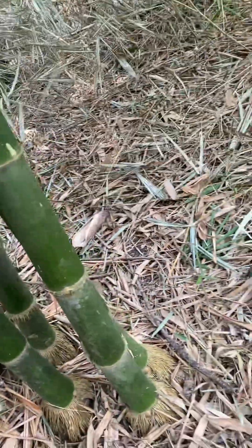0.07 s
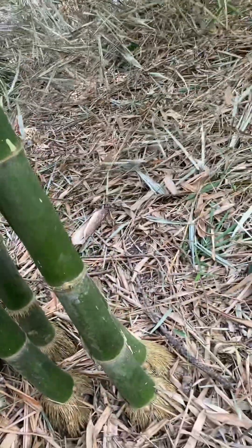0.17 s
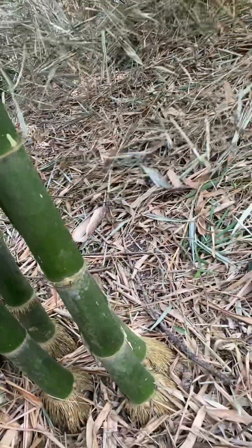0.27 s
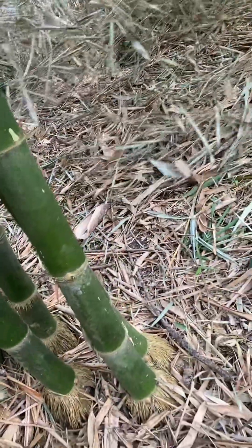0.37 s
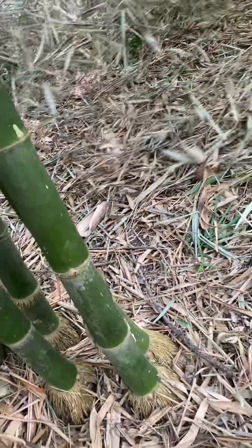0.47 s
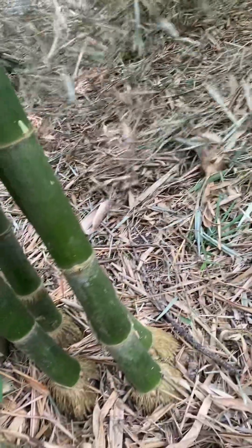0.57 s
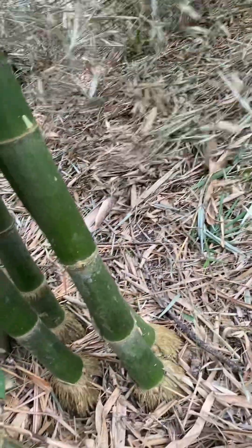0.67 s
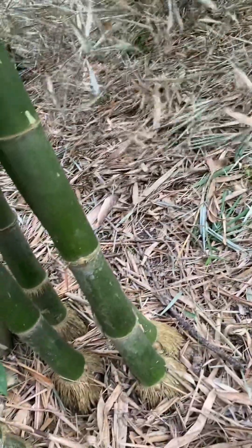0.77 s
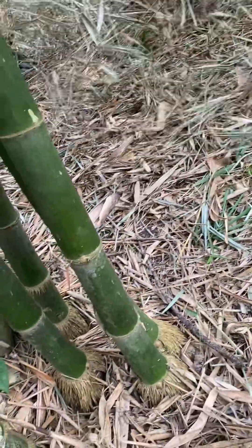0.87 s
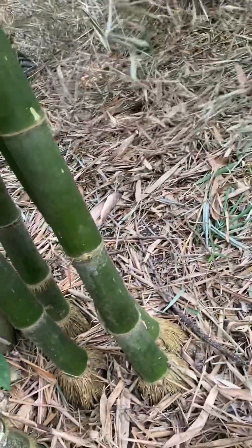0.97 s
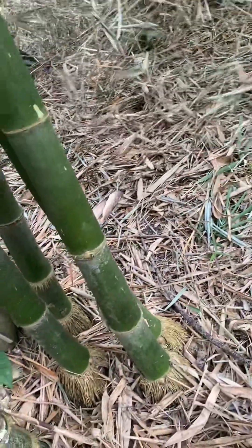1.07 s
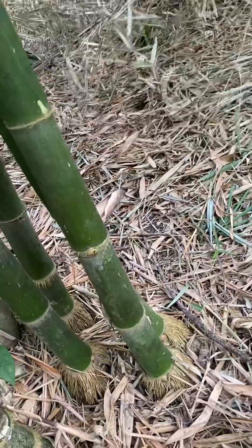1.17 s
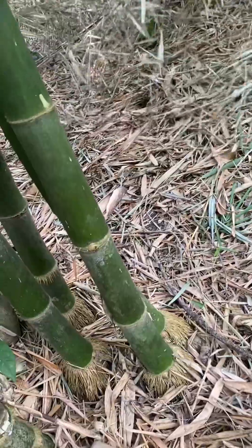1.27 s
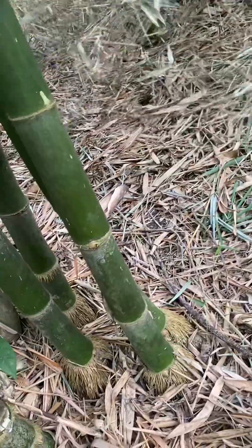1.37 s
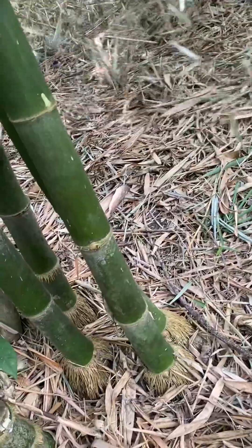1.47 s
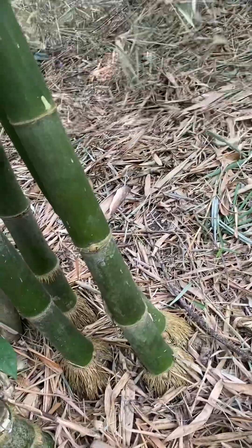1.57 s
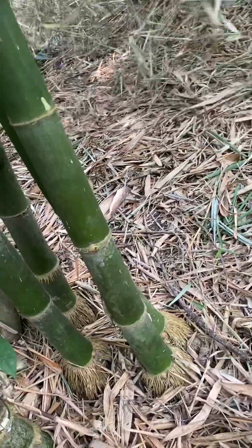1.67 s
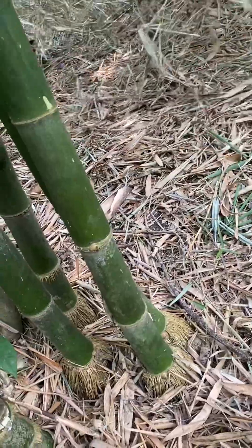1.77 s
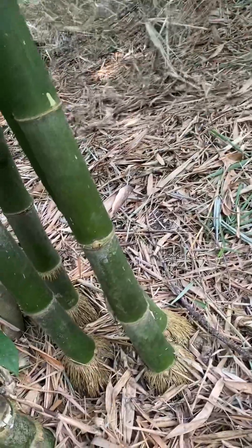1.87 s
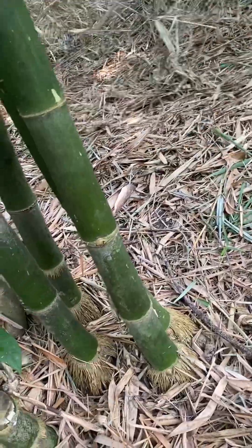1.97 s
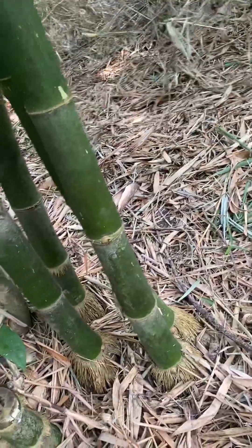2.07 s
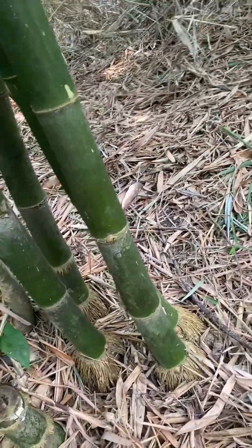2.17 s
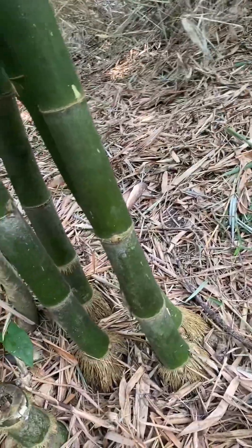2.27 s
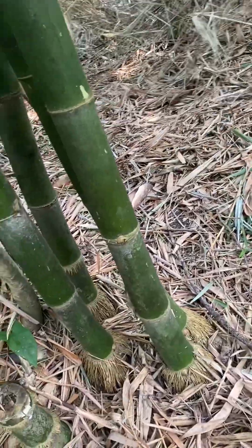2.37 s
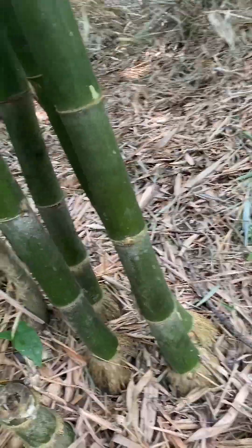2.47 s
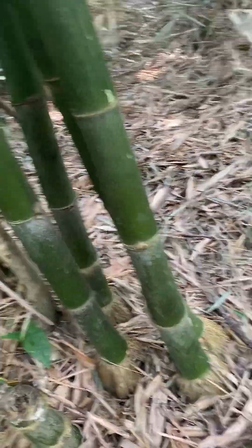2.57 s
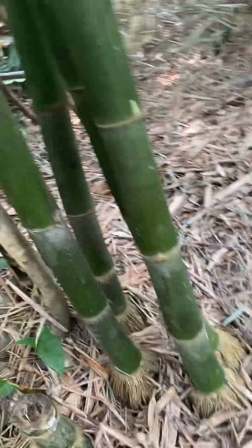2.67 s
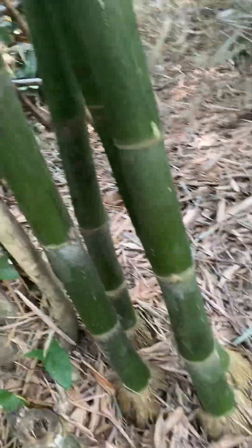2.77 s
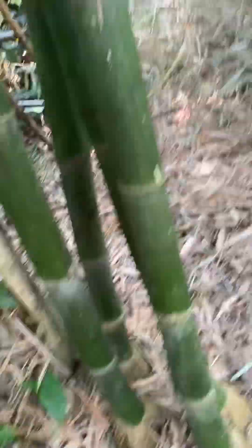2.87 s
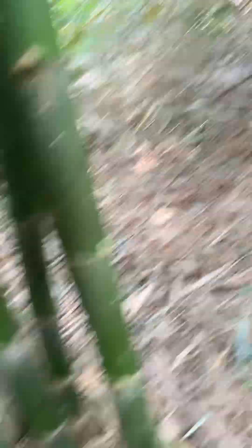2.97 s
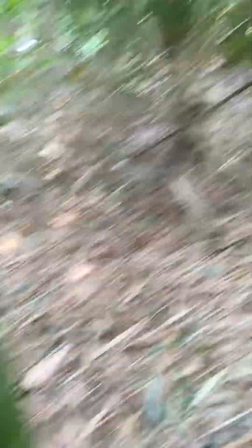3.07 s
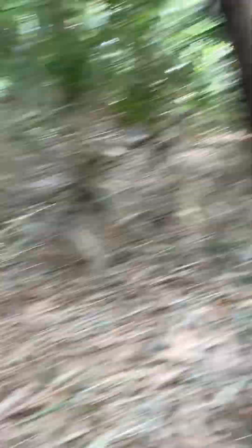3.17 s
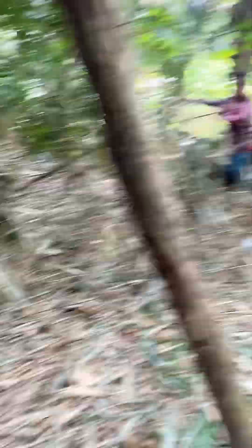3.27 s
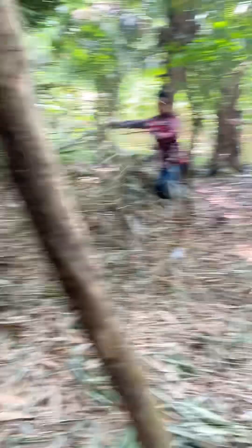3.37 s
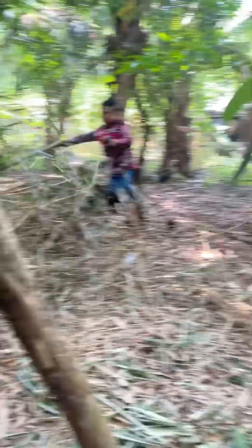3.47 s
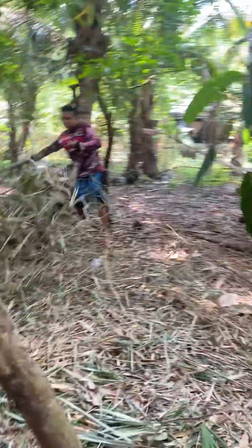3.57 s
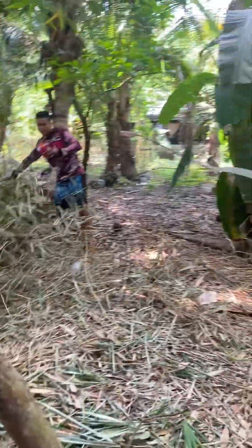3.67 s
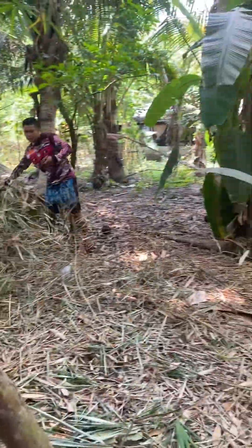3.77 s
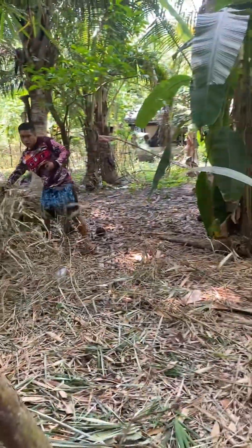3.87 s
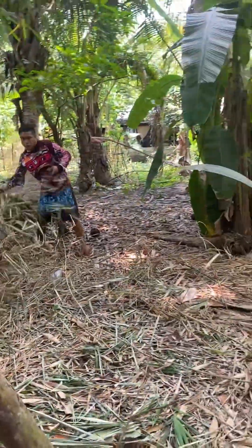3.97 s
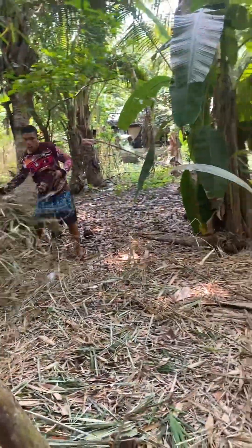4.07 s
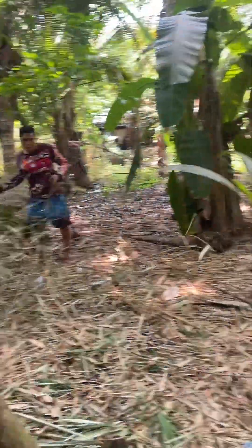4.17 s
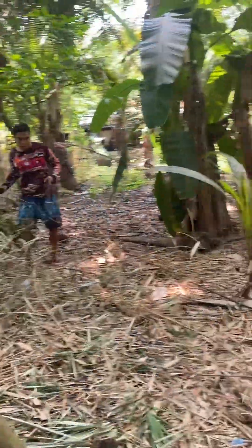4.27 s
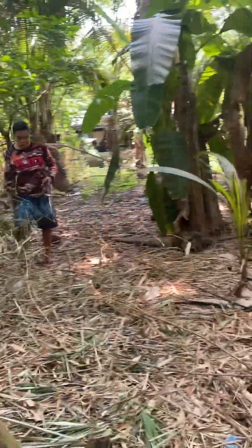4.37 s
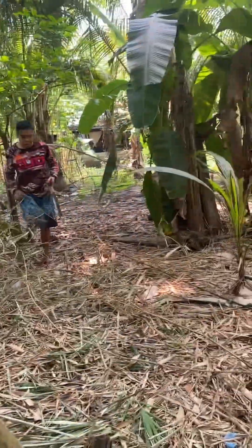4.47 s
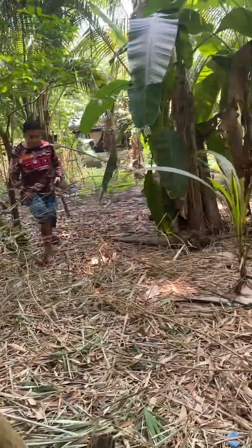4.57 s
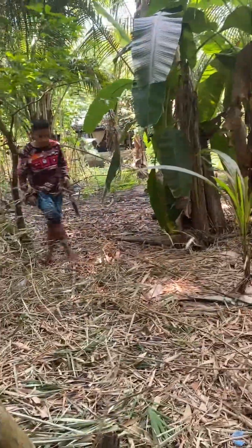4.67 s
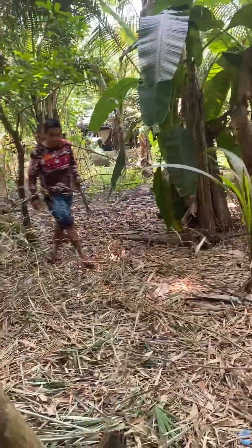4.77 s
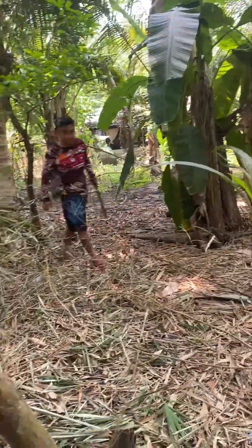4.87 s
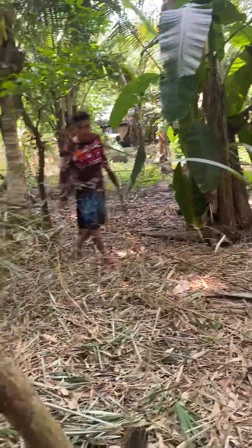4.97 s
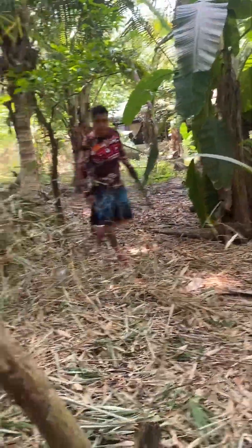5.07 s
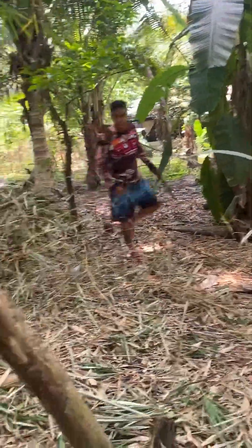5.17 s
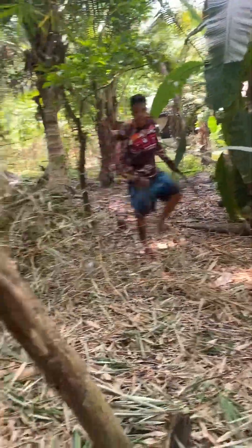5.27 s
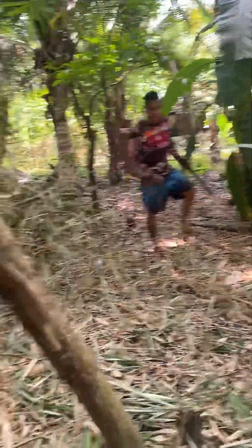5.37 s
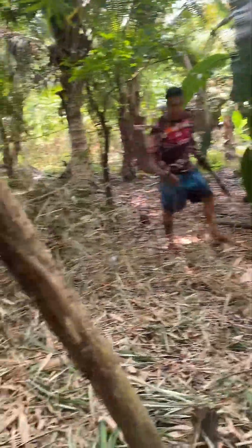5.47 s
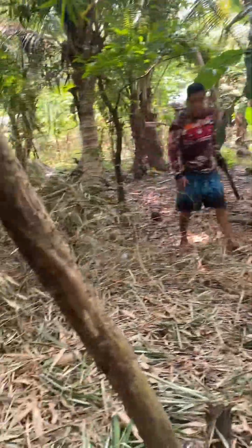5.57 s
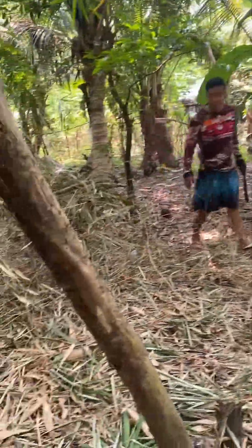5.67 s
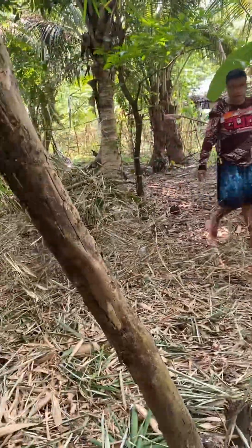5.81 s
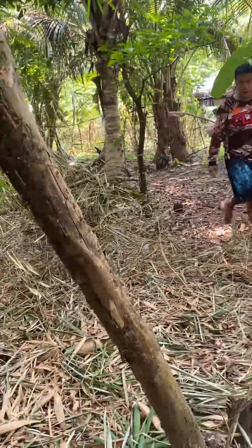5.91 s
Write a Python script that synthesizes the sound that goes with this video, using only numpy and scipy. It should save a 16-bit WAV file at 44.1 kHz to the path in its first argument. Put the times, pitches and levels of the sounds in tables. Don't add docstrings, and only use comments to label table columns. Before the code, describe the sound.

Outdoors in a grove, a bundle of dry leafy branches is dragged across leaf litter, a bright close hiss full of leaf ticks, twig cracks and small hollow knocks. It surges unevenly, fades after about four seconds, and gives way to crunching footsteps. A faint low motor drones far off, with brief soft hoots at the start. Close stereo microphone.

```python
import sys
import numpy as np
from scipy import signal
from scipy.fft import rfft, irfft, dct
from scipy.io import wavfile
from scipy.ndimage import uniform_filter1d

SR = 44100
rng = np.random.default_rng(int(sys.argv[2]) if len(sys.argv) > 2 else 0)


def nominal_scale(level):
    x = np.asarray(level, float) / 20
    return 10 ** x


def put_to_file(sound):
    columns = np.atleast_2d(sound).T
    safe = np.clip(columns, -1, 1)
    whole_steps = np.round(safe * 32767)
    wavfile.write(sys.argv[1], SR, whole_steps.astype(np.int16))


N = 261954


def rms_one(x):
    return x / np.sqrt(np.mean(x ** 2) + 1e-20)


def spectrum_hz():
    return np.maximum(np.arange(N // 2 + 1) * SR / N, 1)


def at_hz(points, hz, column=1):
    points = np.array(points)
    return np.interp(np.log(hz), np.log(points[:, 0]), points[:, column])


def coloured(x, points):
    return irfft(rfft(x) * nominal_scale(at_hz(points, spectrum_hz())), N)


def band(x, low_hz, high_hz):
    sos = signal.butter(2, [low_hz, min(high_hz, SR / 2.2)], "band", fs=SR, output="sos")
    return signal.sosfilt(sos, x)


def drift(rate):
    every, settle = 20, 4000
    r = np.exp(-2 * np.pi * rate * every / SR)
    white = rng.standard_normal(N // every + settle + 2)
    slow = signal.lfilter([1], [1, -2 * r, r * r], white)[settle:]
    return np.interp(np.arange(N) / every, np.arange(len(slow)), rms_one(slow))


def surge(s, rise_s, fall_s):
    return np.interp(np.arange(N) / SR, [s - rise_s, s, s + fall_s], [0, 1, 0])


def effort():
    # time in seconds, speed in dB against full drag, wood in dB (more twig than leaf).
    pull = [(0.0, -9.5, 4), (0.18, -10.5, 0.1), (0.37, -0.3, -1.2), (1.22, -2, -1.4), (1.44, 1.2, -2.8),
            (1.95, -1, -2.2), (2.33, -3.6, -3.6), (2.62, 0.2, -2), (2.87, -2.4, 0.2), (3.16, 1.7, 1.1),
            (3.41, -2.2, 1.6), (3.63, 1.7, 3), (3.77, 1.5, 1.1), (3.93, -5, 1.9), (4.22, -2.5, 2.5),
            (4.57, -13, 4), (5.04, -17.5, 3), (5.845, -23, 7)]
    # time in seconds, surge in dB, wood in dB.
    tugs = [(.61, 3, .6), (.82, 2.6, -1.5), (.89, 3.2, -1), (1.315, -.3, 3), (1.57, 1.6, 1.5),
            (1.77, 2.4, -1.5), (2.06, 2.2, 1.2), (2.405, 2.6, 2.2), (2.51, 1.2, 2.2), (2.645, 2.4, -.4),
            (2.785, 1.2, 1.1), (2.98, .8, 1.6), (4.006, 1.8, .2), (4.425, 1.5, -.5)]
    # time in seconds, surge in dB, press and release in seconds, wood in dB.
    steps = [
        (4.69, 3, .12, .11, -1),
        (4.94, 10, .14, .055, 2.2),
        (5.28, 8.5, .21, .22, -5.5),
        (5.528, 14, .065, .3, -.5),
        (5.76, 4.5, .13, .07, .6),
        (5.91, 9, .06, .15, -3),
    ]
    s, *columns = np.transpose(pull)
    out = np.array([np.interp(np.arange(N) / SR, s, column) for column in columns])
    for s, db, wood_db in tugs:
        out = out + np.outer([db, wood_db], surge(s, rise_s=.07, fall_s=.09))
    for s, db, press_s, release_s, wood_db in steps:
        out = out + np.outer([db, wood_db], surge(s, press_s, release_s))
    return out


def turned():
    return np.interp(np.arange(N) / SR, (2.6, 3.6), [0, 1])


def contacts(per_s, spread_db, share):
    sizes_db = spread_db * np.minimum(rng.exponential(1, N), 4)
    sizes = nominal_scale(sizes_db) * (rng.random(N) < per_s / SR)
    near = rms_one(sizes * rng.standard_normal((2, N)))
    return rms_one(share * near + rng.standard_normal((2, N)))


def rustle(clump_db, patchy_db):
    # frequency in Hz, level in dB per Hz.
    full_drag = [(130, -16), (200, -11.5), (350, -7.5), (900, -7.5), (1750, -5.5), (2080, -8.5), (2600, -3),
                 (3000, -5), (4300, -1), (5000, -2), (6500, 0), (9500, 1.5), (12800, -.5), (15300, -8)]
    level_db = -70.6
    centres_hz = (9000, 4300, 1400, 400)
    follows_speed, follows_wood = (1, 1.04, 1.03, 1.17), (0, .2, 1, .7)
    turned_db, trim_db = (0, -1.5, .1, -3.0), (.3, .5, -.2, 2.2)

    shares = np.transpose([follows_speed, follows_wood, turned_db, trim_db])
    effort_db = (shares @ [*effort(), turned(), np.ones(N)])[::-1]
    centres = np.log(centres_hz[::-1])
    fields = [coloured(contacts(per_s=1500.0, spread_db=3.5, share=.3), full_drag) for _ in range(2)]
    clumps = drift(12.0) + .8 * drift(60.0)
    out, edges = 0, np.geomspace(110, 17500, 19)
    for k, (low, high) in enumerate(zip(edges, edges[1:])):
        weights = [np.interp(np.log(low * high) / 2, centres, row) for row in np.eye(4)]
        flicker_db = clump_db * clumps + patchy_db * drift(14.0)
        out = out + nominal_scale(weights @ effort_db + flicker_db) * band(fields[k % 2], low, high)
    return nominal_scale(level_db) * np.sqrt(SR / 2) * out


def hoots():
    # start in seconds, length in seconds, frequency in Hz, level in dB.
    notes = [
        (0.0, .04, 605, -55),
        (.045, .06, 600, -56),
        (.24, .07, 540, -58),
    ]
    t, out = np.arange(N) / SR, 0
    for s, length, hz, db in notes:
        swell = np.sin(np.pi * np.clip((t - s) / length, 0, 1)) ** .6
        out = out + nominal_scale(db) * np.sin(2 * np.pi * hz * t) * swell
    return np.sqrt(2) * out


def drone_db():
    # peak time in seconds, swell in dB.
    swells = [
        (.32, 2),
        (.64, 3),
        (1.1, 5),
        (1.6, 1.5),
        (2.48, 3),
        (2.79, 3),
        (3.16, 2.5),
        (4.0, -3),
        (5.18, 4),
        (5.62, 2),
    ]
    start_db, fade_db_per_s, throb_db = -46.6, 1.1, 1.1
    swell_db = sum(db * surge(s, rise_s=.15, fall_s=.15) for s, db in swells)
    return start_db - fade_db_per_s * np.arange(N) / SR + throb_db * drift(3.0) + swell_db


def drone():
    # frequency in Hz, level in dB per Hz.
    rumble = [(15, -43), (25, -13), (44, -2), (65, 0), (112, -3), (172, -15), (220, -13), (290, -43),
              (480, -120)]
    # centre in Hz, width in Hz, level in dB.
    firing = [
        (60, 4, -5),
        (95, 30, -5),
        (122, 7, -10),
    ]
    hz = spectrum_hz()
    colour = nominal_scale(at_hz(rumble, hz)) * np.clip(hz / 45, 0, 1) ** 2.1 * (hz < 260)
    out = rms_one(irfft(rfft(rng.standard_normal(N)) * colour, N))
    for centre_hz, width_hz, db in firing:
        peak = 1 / (1 + ((hz - centre_hz) / width_hz * 2) ** 2)
        out = out + nominal_scale(db) * rms_one(irfft(rfft(rng.standard_normal(N)) * peak, N))
    return nominal_scale(drone_db()) * rms_one(out)


def snaps(events, width, trim_db):
    length = 900
    out, t = np.zeros((2, N + length)), np.arange(length) / SR
    for s, peak_db, hz, decay_ms in events:
        splinters = rng.standard_normal((2, length)) * np.exp(-1000 * t / decay_ms)
        burst = band(splinters, hz / width, hz * width)
        at = round(s * SR)
        out[:, at:at + length] += nominal_scale(peak_db + trim_db) * burst / np.abs(burst[0]).max()
    return out[:, :N]


def leaf_snaps():
    # time in seconds, peak in dB.
    ticks = [(.0138, -29), (.0752, -32), (.3742, -23), (.6069, -20), (.9352, -19), (1.9654, -20),
             (1.9722, -21), (1.9864, -21), (2.2819, -24), (2.4009, -20), (2.6335, -20), (3.9171, -24),
             (4.1468, -22), (4.37, -26), (4.4681, -26), (4.5471, -31), (4.6326, -29), (4.6608, -32),
             (4.7971, -34), (4.9023, -29), (5.0552, -34), (5.1752, -34), (5.2526, -28), (5.5077, -30),
             (5.544, -28), (5.5578, -28), (5.6579, -33), (5.758, -31), (5.8694, -29), (5.9034, -35)]
    # time in seconds, peak in dB, centre in Hz.
    tears = [(.6606, -19, 8620), (.715, -22, 9200), (1.2918, -23, 6960), (1.7668, -21, 9210),
             (2.0578, -16, 10200), (2.1383, -21, 7090), (4.415, -27, 7470), (4.7587, -36, 5090),
             (4.9379, -29, 7210), (4.9526, -26, 9880), (5.4634, -37, 6850), (5.5219, -25, 6180)]
    stray_count, stray_db = 40, -22
    tick_hz, pitch_spread, tick_ms, tear_ms = 7800, .15, 1.1, 4.0
    when = rng.uniform(0, N / SR, stray_count)
    stray = zip(when, stray_db + effort()[0][(when * SR).astype(int)])
    events = []
    for s, db in [*ticks, *stray]:
        events.append((s, db, tick_hz * np.exp(pitch_spread * rng.standard_normal()), tick_ms))
    for s, db, hz in tears:
        events.append((s, db, hz, tear_ms))
    return snaps(events, width=1.8, trim_db=.6)


def twig_cracks():
    # time in seconds, peak in dB, centre in Hz, decay in milliseconds.
    cracks = [(0.367, -31, 2200, 2.0), (0.813, -25, 4600, 7.0), (1.1393, -22.5, 4100, .8),
              (1.2915, -24.3, 1500, 4.5), (1.536, -28, 1500, 2.0), (1.771, -30, 2400, 2.0),
              (2.0413, -26, 5200, 3.0), (2.1849, -26, 3700, 2.0), (2.3984, -25, 1700, 2.0),
              (3.131, -30, 2200, 2.0), (4.368, -36, 1200, 2.5), (4.7217, -36, 1800, 2.5),
              (4.8444, -34, 1800, 8.0), (4.935, -35, 1400, 3.0), (5.5054, -34, 4000, 2.0),
              (5.5209, -29, 1700, 3.5), (5.6545, -36, 1800, 2.0), (5.7568, -40, 1700, 2.0),
              (5.8686, -42, 2500, 1.5), (5.934, -41, 1300, 3.0)]
    return snaps(cracks, width=2.2, trim_db=.3)


def knocks(decay_s, trim_db):
    # time in seconds, peak in dB, pitch in Hz.
    blows = [(0.5789, -39, 530), (0.9189, -40, 400), (1.2985, -35.5, 520), (1.3556, -33, 530),
             (1.52, -39, 370), (1.5785, -32.5, 385), (1.972, -39, 330), (1.993, -39, 500),
             (2.385, -39, 420), (2.5138, -35, 270), (2.5158, -36, 600), (2.9587, -38, 740),
             (5.532, -40, 420), (5.548, -43, 330), (5.575, -46, 440), (5.605, -47, 350), (5.7, -50, 330)]
    length = 3000
    out, t = np.zeros((2, N + length)), np.arange(length) / SR
    envelope = (1 - np.exp(-t / .002)) * np.exp(-t / decay_s)
    for s, peak_db, hz in blows:
        body = np.sin(2 * np.pi * hz * t) + .7 * np.sin(2 * np.pi * hz * 1.36 * t)
        at = round((s - .003) * SR)
        out[:, at:at + length] += nominal_scale(peak_db + trim_db) * body * envelope
    return out[:, :N]


def ports(fields, pair):
    hz = spectrum_hz()
    alike = np.clip(at_hz(pair, hz), 0, 1)
    shared, apart = rfft(fields) * np.sqrt([(1 + alike) / 2, (1 - alike) / 2])
    late = np.exp(-1j * at_hz(pair, hz, column=2))
    tilt = nominal_scale(at_hz(pair, hz, column=3) / 2)
    return irfft([(shared + apart) * tilt, (shared - apart) * late / tilt], N)


def heard_while_turning(fields):
    # frequency in Hz, likeness 0-1, left lead in radians, left over right in dB.
    before = [(300, .98, -.25, 1.5), (600, .88, -.7, -1), (860, .67, -1.1, -2.7), (1200, .45, .6, -3.8),
              (1500, .88, .1, 0), (2150, .88, .1, 0), (2600, .6, .3, -4), (3400, .34, 0, 1.2),
              (4000, .67, .2, 1.8), (5000, .25, 1.6, 0), (5500, .6, 1.1, 1.3), (7400, .84, 2.62, 0),
              (10000, .92, 3.14, 0), (12700, .78, 3.6, 0), (14700, .8, 5.95, 0)]
    # frequency in Hz, likeness 0-1, left lead in radians, left over right in dB.
    after = [(100, .99, 0, 0), (340, .9, -.3, 1.2), (860, .8, -.3, 2), (1300, .85, -.3, .5),
             (2200, .9, 0, 0), (3000, .76, .2, -.6), (4000, .63, .4, -1.5), (5000, .54, 1.9, -.9),
             (5500, .73, 1.5, 1), (7400, .82, 2.5, 0), (9500, .92, 3.14, 0), (12000, .84, 3.8, 0),
             (13700, .8, 5.2, 0), (15300, .76, 5.75, 0)]
    return (1 - turned()) * ports(fields, before) + turned() * ports(fields, after)


def scene():
    branches = rustle(clump_db=.5, patchy_db=.95) + hoots() + leaf_snaps() + twig_cracks()
    branches = branches + knocks(decay_s=.009, trim_db=.6)
    return heard_while_turning(branches) + drone() * nominal_scale([[.1], [-.1]])


def masked_bands(x, margin_db, step_db, from_hz):
    hop, top_hz = 1024, 15800
    lead = 2 * hop - 602
    pair = np.pad([x[0] + x[1], x[0] - x[1]], ((0, 0), (lead, 3 * hop))) / 2

    window = signal.windows.kaiser_bessel_derived(2 * hop, 4 * np.pi)
    starts = np.arange(pair.shape[1] // hop - 1)[:, None] * hop
    frames = pair[:, starts + np.arange(2 * hop)] * window
    a, b, c, d = np.split(frames, 4, axis=2)
    folded = np.concatenate([-c[..., ::-1] - d, a - b[..., ::-1]], axis=2)
    bins = dct(folded, type=4, norm="ortho")
    count = bins.shape[1]
    hz = np.arange(hop) * SR / 2 / hop

    edges = np.r_[0:96:8, 96:224:16, 224:hop:32]
    widths = np.diff(np.r_[edges, hop])
    power = np.repeat(np.add.reduceat(bins ** 2, edges, axis=2) / widths, widths, axis=2) + 1e-20
    steady = uniform_filter1d(power, size=2, axis=1)
    weak = (steady < steady[::-1] * nominal_scale(-2 * margin_db)) & (hz > from_hz)

    gap_chance = np.interp(hz, [2500, 6000, 7500, 11500, 13000, 15000], [0, .015, .5, 1.8, 1, .75])
    gap_chance = np.reshape([.23, .03], (2, 1, 1)) * gap_chance * rng.exponential(1, (count, 1))
    gaps = np.repeat(rng.random((2, count, hop // 16)), 16, axis=2) < gap_chance
    frame_s = (np.arange(count) * hop + hop - lead) / SR
    gaps &= ((frame_s < 3.72) | (frame_s > 4.68))[:, None]
    gaps[:, 1:] |= gaps[:, :-1] & (rng.random(count - 1) < .5)[:, None]

    step = np.sqrt(power.max(axis=0)) * nominal_scale(step_db) * np.clip(hz / from_hz / 1.6, .03, 1)
    luck_db = np.repeat(rng.normal(0, 2.2, (2, count, len(widths))), widths, axis=2)
    side_db = np.reshape([0, 1.6], (2, 1, 1)) * (hz < 6500)
    step = step * nominal_scale(luck_db - .6 * (hz > 11500) + side_db)
    coarse = np.sign(bins) * np.floor(np.abs(bins) / step + .4) * step
    kept = coarse * ~(weak | gaps) * (hz < top_hz)

    u, v = np.split(dct(kept, type=4, norm="ortho"), 2, axis=2)
    rising = np.concatenate([v, -v[..., ::-1]], axis=2) * window[:hop]
    falling = np.concatenate([-u[..., ::-1], -u], axis=2) * window[hop:]
    joined = (rising[:, 1:] + falling[:, :-1]).reshape(2, -1)
    mid, side = joined[:, lead - hop:lead - hop + N]
    return np.array([mid + side, mid - side])


def band_limit(x):
    return signal.sosfilt(signal.butter(12, 17080, fs=SR, output="sos"), x)


def record(dry):
    mix = masked_bands(dry, margin_db=7.6, step_db=-5.6, from_hz=1450)
    return band_limit(mix)


dry = scene()
out = record(dry)
put_to_file(out)
```